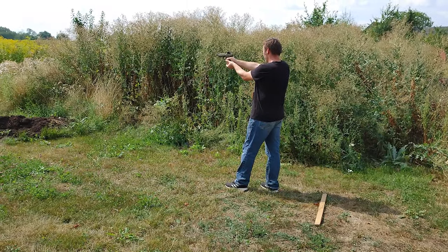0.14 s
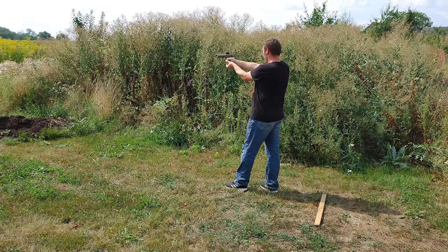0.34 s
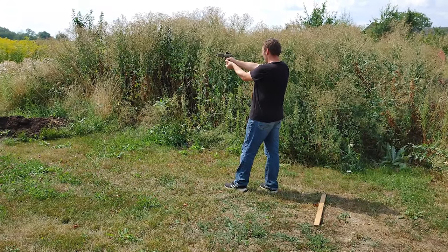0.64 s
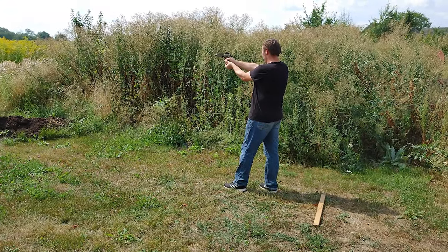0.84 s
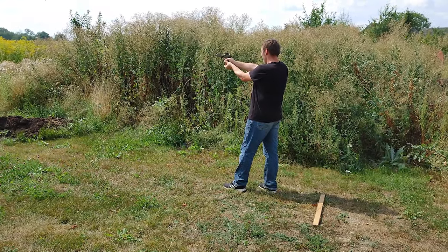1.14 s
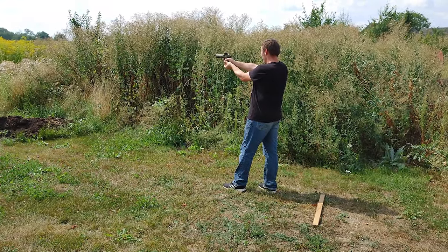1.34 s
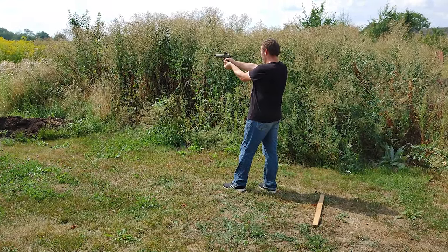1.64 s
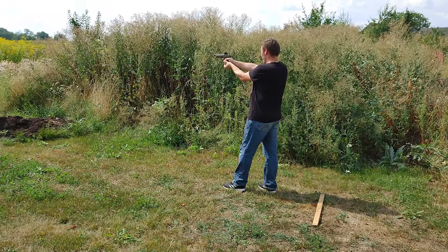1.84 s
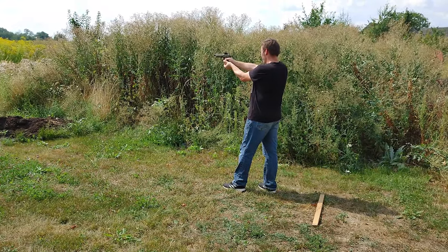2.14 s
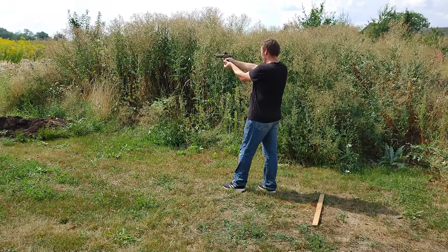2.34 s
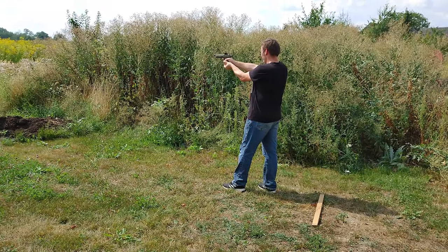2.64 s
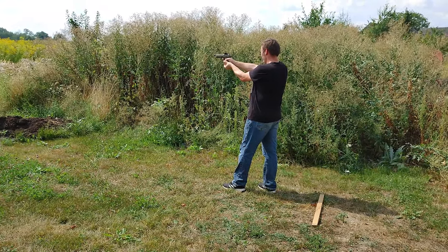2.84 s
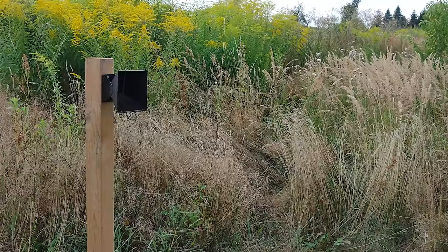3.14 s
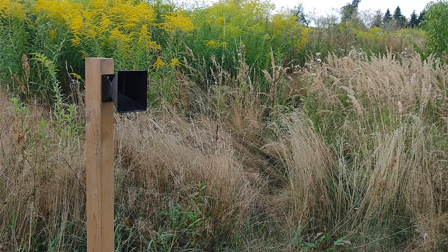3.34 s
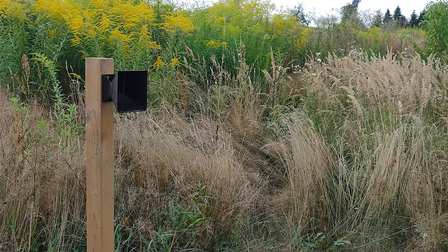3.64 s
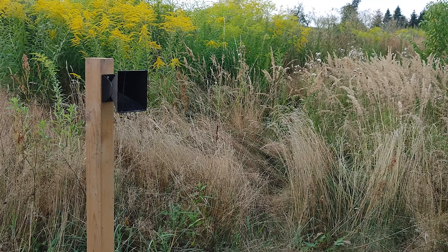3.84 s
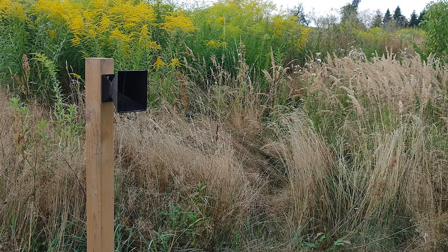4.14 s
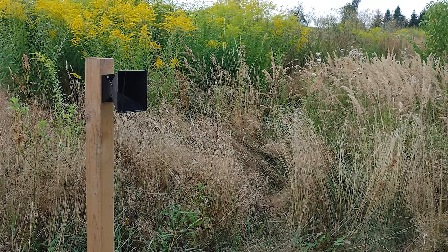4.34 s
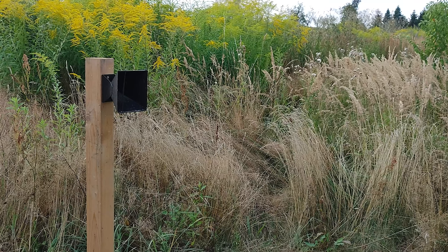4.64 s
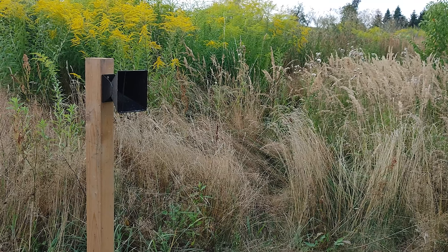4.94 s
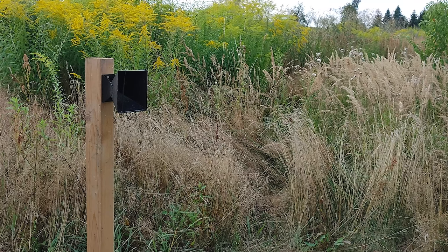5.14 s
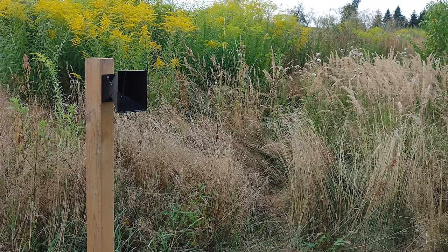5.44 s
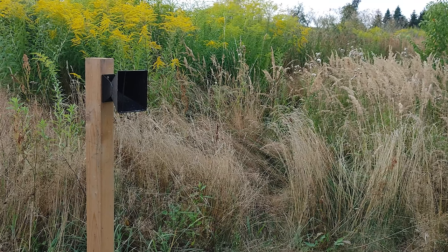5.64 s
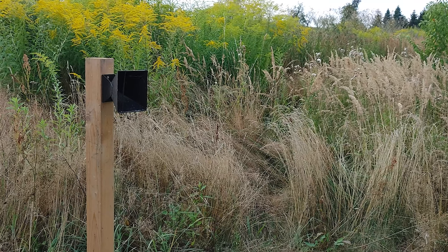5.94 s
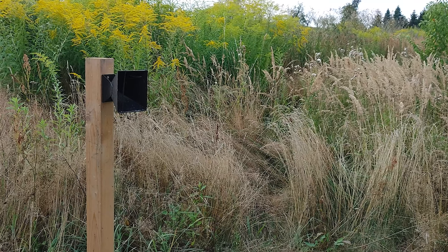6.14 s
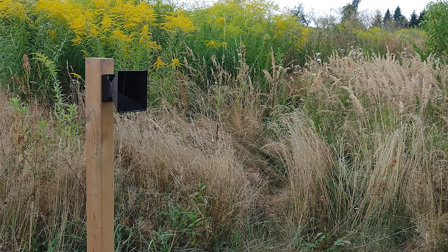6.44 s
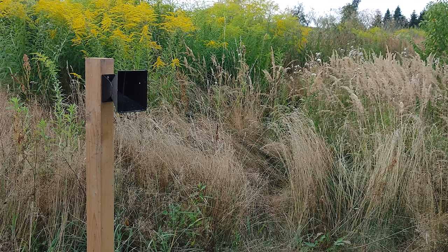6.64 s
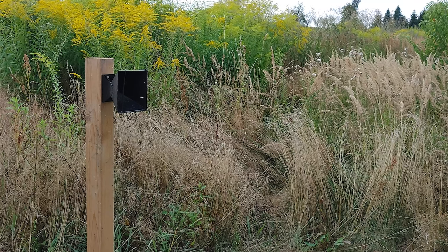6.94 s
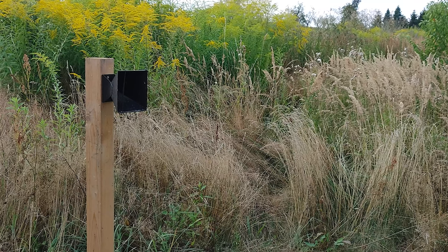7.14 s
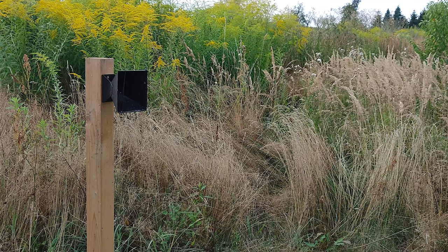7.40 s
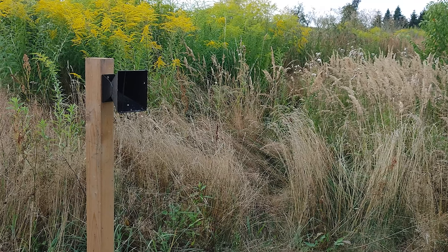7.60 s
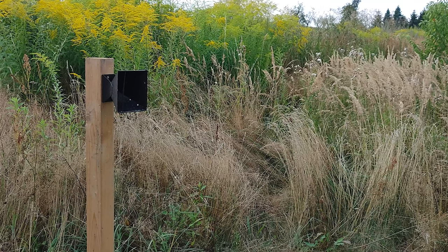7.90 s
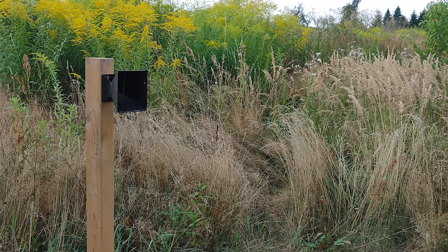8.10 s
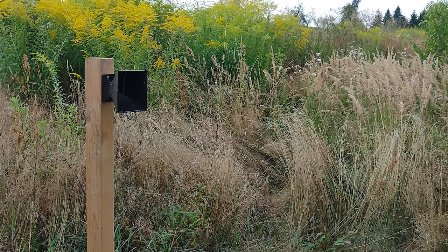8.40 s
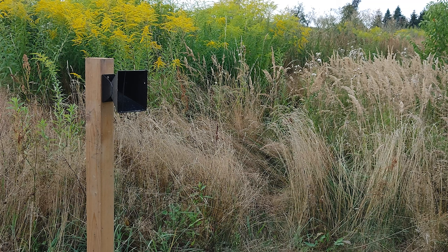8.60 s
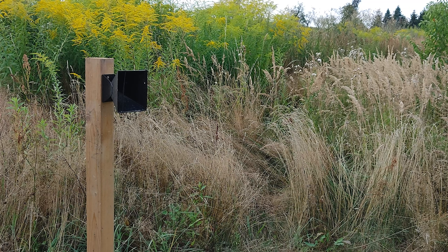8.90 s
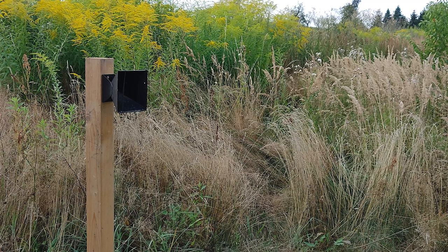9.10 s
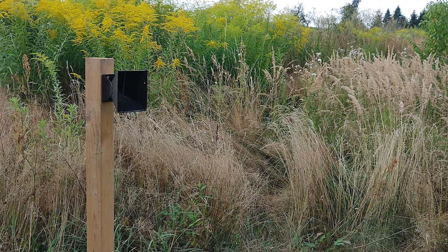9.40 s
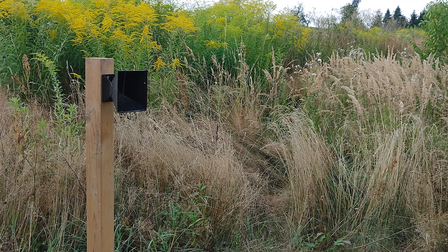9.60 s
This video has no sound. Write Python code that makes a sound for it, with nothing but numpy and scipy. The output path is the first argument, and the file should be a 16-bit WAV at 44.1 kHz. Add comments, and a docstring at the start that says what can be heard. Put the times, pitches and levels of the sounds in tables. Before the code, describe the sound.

From 0 to 3.2 s, close to the shooter in a breezy open meadow, a gas airsoft pistol fires seven shots, at about 0.2, 0.6, 1.2, 1.6, 2.0, 2.35 and 2.75 s. Each has a tiny bright tick, a blunt gas blast, a slide clack some 50 ms later and a short hissy tail; most are loud enough to saturate, the fifth and sixth weaker. Pellet cracks on steel follow some shots. At 3.17 s the sound cuts to beside the metal box: a stronger shot at 3.4 s with soft low knocks until 4 s, then quieter pops from the right every 0.35 to 0.55 s until 8.1 s, each answered about 90 ms later by a dry, rattling steel smack and faint echo. The hit at 8.2 s adds a woody thud. Two half-speed, deeper shots come at 9.0 and 9.7 s, with one stretched hit between, over stronger hiss.

```python
"""Sharp pistol shots in a breezy meadow: tick, gas blast, slide slamming home, then a pellet cracking on a steel box.
Listening is by the shooter (loud shots saturate), then from 3.165 s by the box; the last two shots run at half speed.
Blast, slide and cracks are coloured noise bursts, pistol frame and box are damped modes, and tall weeds add
streaky noise tails. Short steel-coloured noises, dull knocks, a far-wall echo and wavering air fill in."""
import sys
import numpy as np
from scipy import signal
from scipy.fft import rfft, irfft, next_fast_len
from scipy.io import wavfile
from scipy.ndimage import uniform_filter1d, map_coordinates

SR = 44100
rng = np.random.default_rng(int(sys.argv[2]) if len(sys.argv) > 2 else 0)


def field_ratio(decibels):
    """Amplitude ratio for a level in dB (20 dB per decade); scalars and array-likes work."""
    return 10 ** (np.asarray(decibels, dtype=float) / 20)


def store_wav(level_fs):
    """Save 16-bit WAV to argv[1]."""
    pcm = np.round(np.clip(np.atleast_2d(level_fs), -1, 1) * 32767)
    wavfile.write(sys.argv[1], SR, pcm.T.astype(np.int16))


N = 430416
MOVED_S, SLOWED_S = 3.165, 8.53  # listening point moves to the box; half speed begins
LEAD, LENGTH = 2048, 18432  # samples ahead of an event's start; samples in the whole event

# Levels are relative. Pairs of settings are [by the shooter, by the box]. Pans are left over right.
# pellets on the box: (time [s], level [dB], walls [dB], hollow [dB])
HITS = [(0.391, -2.27, -19, -24.5), (1.3418, 2, -19, -27.5), (1.7409, -4.1, -11.5, -24.5),
        (2.9093, -3.5, -11, -24), (4.149, -11.5, -17, -23), (4.597, -14, -10, -18),
        (4.9591, -12.5, -13, -16), (5.3233, -12, -15.5, -17.5), (5.7099, -12.5, -16, -37),
        (6.2477, -13, -11, -17.5), (6.6643, -15, -11, -17.5), (6.995, -12.5, -5.5, -20),
        (7.3916, -13, -9, -23.5), (7.7828, -15, -16, -36), (8.2123, -13, -17, -18.5),
        (9.2215, -10.5, -18, -20)]
# colour of struck steel: (frequency [Hz], density [dB per Hz])
STEEL = [(88, -65), (150, -23), (622, -32), (1590, -19), (2630, -9.5), (3140, -2), (7260, -12), (8650, -1),
         (9720, -15), (12000, -8), (15800, -16.5)]
# colour of a pellet's crack: (frequency [Hz], density [dB per Hz])
PELLET = [(88, -54.5), (150, -24.5), (565, -24), (1360, -15), (2130, -16.5), (4290, -5.5), (4730, -8),
          (6710, -7.5), (9350, -5), (12000, -8), (15800, -12)]
# pistol frame modes: (nominal frequency [Hz], level [dB], t60 [s])
FRAME = [(312, 2, 0.015), (476, 3, 0.016), (648, -1.5, .04), (1240, -0.5, 0.018), (1537, 0, 0.013),
         (1650, -5.5, 0.042), (1970, -6, .04), (2420, -1, .04), (2940, -4, 0.077), (3480, 0, 0.024),
         (3660, -5.5, 0.019), (3910, -8.5, .035), (4780, -7, 0.035), (6560, -3, .03), (7960, -1.5, .03)]


def at_box(s):
    """Index of the listening point: 0 by the shooter, 1 by the box."""
    return int(s > MOVED_S)


def slowed(s):
    """Time stretch: 1 at full speed, 2 at half speed."""
    return 1 + (s > SLOWED_S)


def unit(x):
    """Scales to rms 1."""
    return x / np.sqrt(np.mean(x ** 2) + 1e-20)


def along(points, hz):
    """Interpolates (Hz, value) points on a log frequency axis."""
    f, v = np.transpose(points)
    return np.interp(np.log(hz + 1), np.log(f + 1), v)


def noise(colour, alike, size=LENGTH, low_db=0):
    """Stereo noise of rms 1; alike is the left-right correlation in the bass, falling towards the treble."""
    hz = np.fft.rfftfreq(size, 1 / SR)
    correlation = np.clip(alike, 0, 1) / (1 + hz / 9000)
    turn = np.arccos(correlation) / 2
    gain = field_ratio(along(colour, hz) + low_db / (1 + (hz / 1200) ** 4))
    spectrum = rfft(rng.standard_normal((2, size)))
    mid, side = irfft(spectrum * gain * [np.cos(turn), np.sin(turn)], size)
    return unit(np.array([mid + side, mid - side]))


def decay(t60, start=0, rise=0.0002):
    """Envelope swelling exponentially up to its start, then dying; all in seconds."""
    t = (np.arange(LENGTH) - LEAD) / SR - start
    return np.where(t < 0, np.exp(np.minimum(t, 0) / rise), field_ratio(-60 * np.maximum(t, 0) / t60))


def parts(table, column, longer, rise):
    """Envelope of several bursts, each at a slightly random level; longer scales every t60."""
    bursts = [field_ratio(row[column] + rng.normal(0, 1.3)) * decay(longer * row[3], row[0], rise) for row in table]
    return sum(bursts)


def ring(modes, spread_db=4, rough=0.047):
    """Damped modes of random strength, wavering in phase, gliding up in pitch, out of phase between channels."""
    t = np.maximum(np.arange(LENGTH // 2) - LEAD, 0) / SR
    hz, db, t60 = np.transpose(modes)[:, :, None]
    draw = rng.standard_normal((len(modes), 3))
    bend = 1 + 0.009 * draw[:, :1] - 0.019 * np.exp(-t / 0.054)
    waver = rough * np.cumsum(rng.standard_normal((len(modes), len(t))), axis=1)
    phase = 2 * np.pi * np.cumsum(hz * bend * (t > 0), axis=1) / SR + waver
    onset = 1 - np.exp(-t / 0.00083)
    fade = np.cos(np.pi * t / t[-1] / 2)
    size = field_ratio(db + spread_db * draw[:, 1:2] - 60 * t / t60) * onset * fade
    pair = [np.sum(size * np.sin(phase + side * 0.6 * draw[:, 2:]), axis=0) for side in (1, -1)]
    return np.pad(pair, ((0, 0), (0, LENGTH // 2)))


def scatter(s, db):
    """Weeds send back a streaky noise tail whose frequencies each die at their own speed."""
    # colours by the shooter, by the box: (frequency [Hz], density [dB per Hz])
    weeds = [
        [(88, -54), (150, -27), (802, -24.5), (1310, -12), (1620, -10.5), (2630, -4.5), (7260, -11),
         (8320, -5.5), (11400, -2.5), (15800, -39.5)],
        [(88, -56), (150, -24.5), (483, -9.5), (818, -16.5), (1230, -2), (1890, -2.5), (3970, -5.5),
         (4730, -8.5), (9170, -5), (15800, -7.5)],
    ]
    # decay by the shooter, by the box: (frequency [Hz], t60 [s])
    weeds_t60 = [
        [(300, 0.11), (1000, 0.25), (2000, 0.2), (4000, .27), (8000, 0.3), (14000, 0.042)],
        [(300, 0.06), (1000, 0.091), (2000, 0.15), (4000, 0.29), (8000, 0.28), (14000, 0.082)],
    ]
    place = at_box(s)
    hz, t, z = signal.stft(noise(weeds[place], alike=0.66), SR, nperseg=512)
    t = np.maximum(t - LEAD / SR, 0)
    streaks = unit(uniform_filter1d(rng.standard_normal(z.shape[1:]), size=9, axis=1))
    fall_db = 60 * t / along(weeds_t60[place], hz)[:, None]
    tail = signal.istft(z * field_ratio(5.7 * streaks - fall_db), SR, nperseg=512)[1][:, :LENGTH]
    return field_ratio(db) * tail * decay(15.0, start=0.018, rise=.003)


def add(out, s, sound, db, pan_db, lag_s):
    """Places a sound, left lagging by lag_s; half speed halves its pitch; the move cuts off earlier sounds."""
    # spans in which the sound is duller above 12 kHz: (from [s], to [s])
    dull_spans = [(0, 1.9), (2.7, 3.6)]
    dull_hz, dull_db = 12140, -12.5
    hz = np.fft.rfftfreq(LENGTH, 1 / SR)

    def above(edge_hz):
        return (1 + np.tanh((hz - edge_hz) / 150)) / 2

    dull = any(a < s < b for a, b in dull_spans)
    low_cut = hz ** 4 / (hz ** 4 + 150 ** 4)
    tone = low_cut * (1 - above(20200)) * field_ratio(dull * dull_db * above(dull_hz))
    lag = np.exp(-1j * np.pi * hz * lag_s * np.array([[1], [-1]]))
    stretch = slowed(s)
    # a longer inverse transform stretches time; the factor restores the level
    sound = stretch * irfft(rfft(sound) * tone * lag, LENGTH * stretch)
    start = round(s * SR) - LEAD * stretch
    if s < MOVED_S:
        sound = sound * (start + np.arange(LENGTH) < MOVED_S * SR)
    out[:, start:start + LENGTH * stretch] += field_ratio(db) * sound * field_ratio([[pan_db / 2], [-pan_db / 2]])


def air():
    """Breeze: wavering hiss, its colour and level changing at set times, over a steady very deep rumble."""
    # stretches of hiss: (start [s], colour as (frequency [Hz], density [dB per Hz]))
    stretches = [(0, [(15, -41.5), (25, -9.5), (157, -6), (930, -13), (3790, -17.5), (5100, -17),
                 (8280, -12), (9480, -22.5), (11500, -11.5), (13500, -51), (15800, -49)]),
                 (3.165, [(15, -56.5), (25, -30), (91, 5.5), (382, 1.5), (1640, -4.5), (1780, -5.5),
                 (4700, -6.5), (5680, -8), (11500, -4.5), (15800, -18.5)]), (4.04, [(20, -2), (90, 0),
                 (400, -4.5), (2000, -5.5), (8000, -9.5), (11500, -6.5), (13000, -0.5), (15800, -3.5)]),
                 (8.532, [(20, 9), (80, -1.5), (200, -5), (500, -6.5), (3000, -14), (6000, -2.5),
                 (7000, 1.5), (10000, 13.5), (10300, -49)])]
    # hiss level: (time [s], level [dB])
    level_points = [(0, -59), (1.9, -58), (2.1, -73), (2.63, -73.5), (2.66, -60.5), (3.16, -58),
                    (3.17, -71.5), (3.4, -65.5), (4, -64.5), (4.1, -69), (5.55, -79), (5.9, -73.5),
                    (6.85, -76), (8.5, -74.5), (8.56, -66.5), (9.76, -59)]
    # balance of each stretch: left over right [dB]
    balance_db = [0.5, -0.5, 1.5, 0]
    t = np.arange(N) / SR
    size = next_fast_len(N)
    stretch = np.searchsorted([start for start, _ in stretches], t, side="right") - 1
    hiss = np.choose(stretch, [noise(colour, alike=0.17, size=size)[:, :N] for _, colour in stretches])
    waver_db = 1.1 * map_coordinates(rng.standard_normal(200), [t * 12])
    pan_db = np.take(balance_db, stretch) / 2 * [[1], [-1]]
    level_db = np.interp(t, *np.transpose(level_points))
    deep = noise([(8, 0.5), (20, -15), (60, -32.5), (120, -59.5)], alike=.7, size=size)[:, :N]
    return hiss * field_ratio(level_db + waver_db + pan_db) + field_ratio(-82.5) * deep


def knocks():
    """Soft low knocks nearby, two short damped modes each."""
    # (time [s], level [dB], nominal frequency [Hz])
    thuds = [(3.169, -54, 417), (3.48, -41, 469.8), (3.605, -46, 481.2), (3.622, -52.5, 392.6),
             (3.701, -51, 504.2), (3.716, -51.5, 617.3), (3.754, -49.5, 359.6), (3.809, -66, 361),
             (4.004, -56, 567)]
    out = np.zeros((2, N + SR))
    for s, db, hz in thuds:
        add(out, s, ring([(hz, 0, .03), (1.52 * hz, -4, .02)], spread_db=2.0), db + 3.5, 0, 0)
    return out


def taps():
    """Short steel-coloured noises with a tail; the two just before 3.165 s are hiss cut off by the move."""
    # (time [s], level [dB], left over right [dB], tail [dB])
    bursts = [(0.8307, -34, 3, -8), (0.8409, -31, -4, -15), (0.9185, -36, 1, -14.5),
              (2.1201, -26, 1, -24.5), (2.1276, -26, -4, -48), (2.5131, -17.5, 4.5, -22),
              (2.5207, -16.5, -6, -30), (2.531, -22.5, -1, -27), (3.149, -42.5, -3, 6),
              (3.159, -37.5, -2.5, -4.5), (4.2459, -42, -4, -12), (4.2654, -40.5, 0, -21),
              (5.947, -53, -3, -18.5), (8.016, -37, 0.5, -18.5)]
    out = np.zeros((2, N + SR))
    for s, db, pan_db, tail_db in bursts:
        burst = noise(STEEL, alike=0.52) * decay(0.032, rise=.0008)
        add(out, s, burst + scatter(s, tail_db), db - 2.5, pan_db, -.0001)
    return out


def wall():
    """Each hit heard by the box returns once from a far wall: a softened crack with a short wash behind it."""
    delay_s, loss_db, pan_db = .0763, -25, -8  # delay at full speed
    out = np.zeros((2, N + SR))
    for s, db, _, _ in HITS:
        if s > MOVED_S:
            envelope = decay(0.011, rise=.0008) + field_ratio(-2.5) * decay(0.068, .004, .002)
            crack = noise(PELLET, alike=0.66, low_db=-21.5) * envelope
            add(out, s + slowed(s) * delay_s, crack, db + loss_db, pan_db, -.0001)
    return out


def box():
    """A pellet cracks on the steel and rattles in noise bursts; thin walls and hollow ring as damped modes."""
    # crack, rattles, a late burst: (after start [s], by shooter [dB], by box [dB], t60 before scaling [s])
    rattle = [(0, -0.5, 2.5, 0.017), (.003, 1.5, 2, 0.026), (.011, 4.5, -15.5, .03), (.017, -15, -22, 0.13),
              (.044, -20, -26.5, .08), (.076, -32, -33, .15)]
    # thin walls: (nominal frequency [Hz], level [dB], t60 [s])
    walls = [(1356, 1, 0.063), (1564, -5, 0.064), (1864, 0.5, 0.061), (1778, -6.5, .13),
             (2520, -5.5, 0.056), (2677, 0.5, 0.031), (3300, -11.5, 0.061), (4150, -7, .1),
             (5150, -14.5, .05), (6100, -17, .08), (8480, -12.5, 0.09)]
    # hollow, quick thud and lasting tone: (nominal frequency [Hz], level [dB], t60 [s])
    boom = [(886, 5.5, .04), (930, -3, 0.23)]
    # wooden post, same columns: (nominal frequency [Hz], level [dB], t60 [s])
    post = [(980, 5.5, 0.021), (353.4, -19, 0.32)]
    # left over right [dB]
    pan_db = [-0.9, -1.35]
    # weed tail [dB]
    tail_db = [-16, -20]
    on_post_s = 8.21  # the hit that shakes the post
    out = np.zeros((2, N + SR))
    for s, db, walls_db, boom_db in HITS:
        near = at_box(s)
        hollow = post if abs(s - on_post_s) < .05 else boom
        steel = field_ratio(walls_db) * ring(walls, spread_db=6, rough=.02)
        steel = steel + field_ratio(boom_db) * ring(hollow, spread_db=1.5, rough=0.017)
        shape = parts(rattle, 1 + near, longer=1.05 if near else .8, rise=0.0005 if near else .00015)
        crack = noise(PELLET, alike=1.0) * shape
        lag_s = -.0001 if near else -.00034
        add(out, s, crack + steel + scatter(s, tail_db[near]), db, pan_db[near], lag_s)
    return out


def tick():
    """Very short bright click of noise, of unit energy in each channel."""
    # colour: (frequency [Hz], density [dB per Hz])
    colour = [(180, -46.5), (300, -10), (6900, -4.5), (8860, -3), (11700, -17.5), (13200, -24.5),
              (15800, -27)]
    click = noise(colour, alike=.1) * decay(.0012, start=.001, rise=.0001)
    return click / np.linalg.norm(click, axis=1, keepdims=True)


def blast(s):
    """Gas noise in several bursts after a short valve hiss, with the frame ringing and a weed tail."""
    # muzzle, then slide thrown back: (after start [s], by shooter [dB], by box [dB], t60 before scaling [s])
    bursts = [(0, -0.5, 4.5, 0.02), (.0085, 0, -6, .02), (.016, -3.5, -8, 0.026), (.023, -24, -25, .05),
              (.032, -17.5, -28.5, .06), (.041, -17.5, -24, 0.025)]
    # gas colour by the shooter: (frequency [Hz], density [dB per Hz])
    gas_near = [(88, -57), (150, -29), (438, -13.5), (587, -21.5), (1120, -6), (1380, -16), (1680, -2),
                (1850, -10.5), (3970, -8.5), (6460, -11.5), (7120, -17), (8320, -8.5), (15800, -25.5)]
    # gas colour by the box: (frequency [Hz], density [dB per Hz])
    gas_far = [(88, 4), (150, -35), (512, 0), (1100, -1), (1720, -2), (2000, -11), (2440, -0.5), (2960, -3),
               (4210, -4), (4640, -9), (8480, -3), (14600, -12.5), (15800, -10.5)]
    # low push [dB]
    push_db = [-2, -8]
    # weed tail [dB]
    tail_db = [-16, -14.5]
    far = at_box(s)
    hiss = field_ratio(-27 if far else -25) * decay(.01, rise=.0065)
    shape = parts(bursts, 1 + far, longer=.9 if far else 1.6, rise=0.00067) + hiss
    gas = noise(gas_far if far else gas_near, alike=0.7, low_db=push_db[far]) * shape
    frame = field_ratio(-14 if far else -9) * ring(FRAME, spread_db=2.5, rough=.03)
    return gas + frame + scatter(s, tail_db[far])


def slide(s):
    """Slide slamming home: a two-part clack of steel noise, the upper frame modes and a weed tail."""
    # bass of the clack [dB]
    low_db = [-15, -4.5]
    # weed tail [dB]
    tail_db = [-11, -9.5]
    far = at_box(s)
    envelope = decay(0.03, 0.00044, 0.0009) + field_ratio(-7) * decay(0.097, 0.004)
    clack = noise(STEEL, alike=0.99, low_db=low_db[far]) * envelope
    return clack + field_ratio(-8) * ring(FRAME[3:]) + scatter(s, tail_db[far])


def pistol():
    """Each shot is tick, blast, slide; from the box the pistol lies to the right."""
    # the slide delay tends to grow as the gas cools
    # (time [s], level [dB], tick [dB], slide delay at full speed [s])
    shots = [(0.2311, 8, 5, .0505), (0.604, 8, -7.5, .0514), (1.183, 8.5, -6, .0525),
             (1.5833, 8.5, -1.5, .0532), (1.9591, -3, -6, .0551), (2.351, -3, -7.5, .0554),
             (2.7485, 8, 5.5, .0549), (3.441, -1, -48, .0498), (4.0604, -9.5, -25.5, .0504),
             (4.5079, -9.5, -19.5, .0523), (4.87, -8.5, -44, .0527), (5.231, -9.5, -24.5, .0529),
             (5.616, -10, -21, .0549), (6.1554, -10.5, -25.5, .0567), (6.5694, -10, -34, .0566),
             (6.8998, -10.5, -46, .0573), (7.2953, -10.5, -17.5, .0578), (7.684, -9.5, -20, .0598),
             (8.1146, -10.5, -23.5, .0577), (9.0278, -10, -18.5, .0618), (9.6783, -10.5, -15.5, .062)]
    # tick lead at full speed [s]
    tick_ahead_s = [.0204, .0219]
    # left over right [dB]
    tick_pan_db = [-1.75, -6]
    # left over right [dB]
    blast_pan_db = [-0.1, -4]
    # left over right [dB]
    slide_pan_db = [-0.64, -4.5]
    # slide against the shot's level [dB]
    slide_db = [-13, -19.5]
    out = np.zeros((2, N + SR))
    for s, db, tick_db, slide_s in shots:
        far = at_box(s)
        lag_s = .0005 if far else -.00002
        add(out, s - slowed(s) * tick_ahead_s[far], tick(), tick_db + 0.5, tick_pan_db[far], -.0001)
        add(out, s, blast(s), db - 6.0, blast_pan_db[far], lag_s)
        add(out, s + slowed(s) * slide_s, slide(s), db + slide_db[far], slide_pan_db[far], lag_s)
    return out


def scene():
    """Sums air, knocks, taps, wall echo, box and pistol."""
    events = knocks() + taps() + wall() + box() + pistol()
    return air() + events[:, :N]


def low_pass(x):
    """Removes everything above the highest recorded frequency."""
    return signal.sosfilt(signal.butter(12, 15980, fs=SR, output="sos"), x)


def record(dry):
    """The loudest blasts saturate just above full scale, with a hard knee."""
    top, hardness = 1.06, 10
    limited = dry / (1 + np.abs(dry / top) ** hardness) ** (1 / hardness)
    return low_pass(limited)


dry = scene()
out = record(dry)
store_wav(out)
```